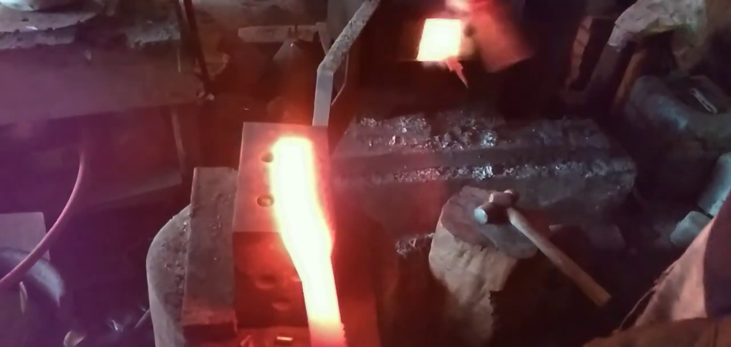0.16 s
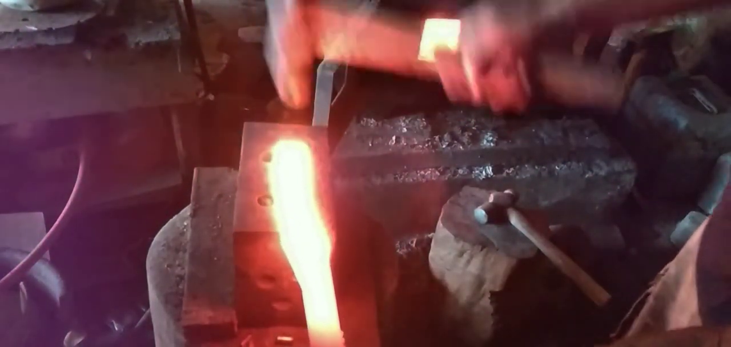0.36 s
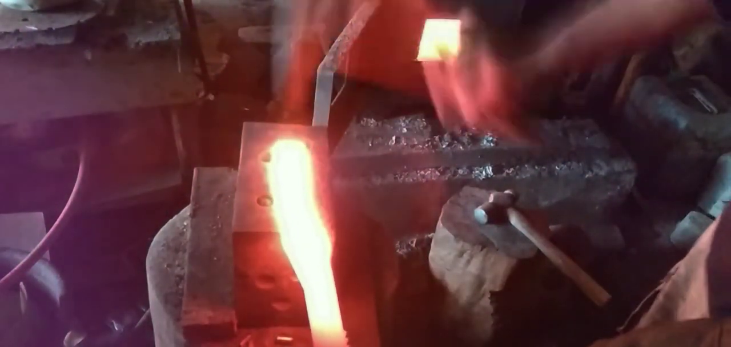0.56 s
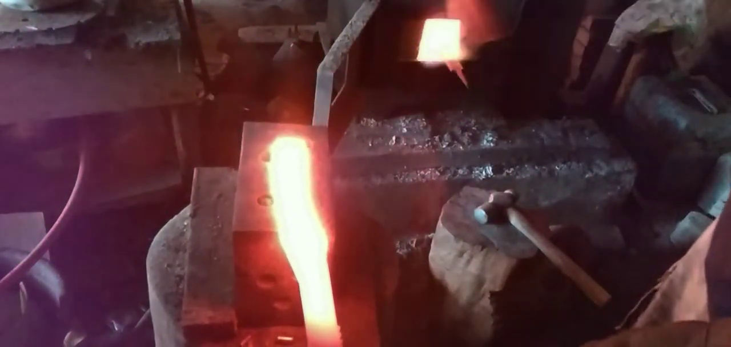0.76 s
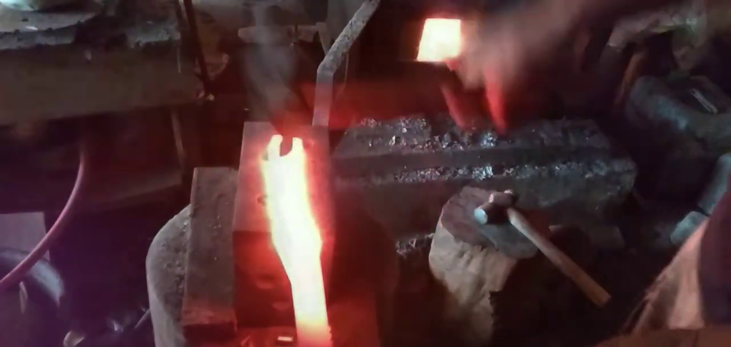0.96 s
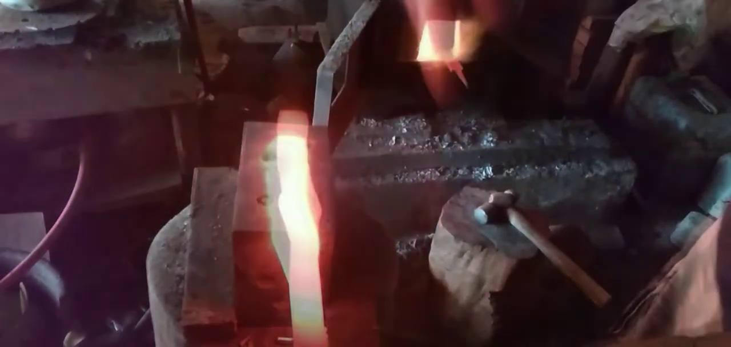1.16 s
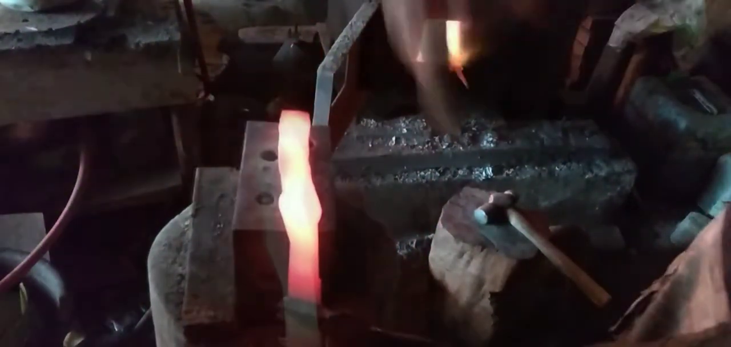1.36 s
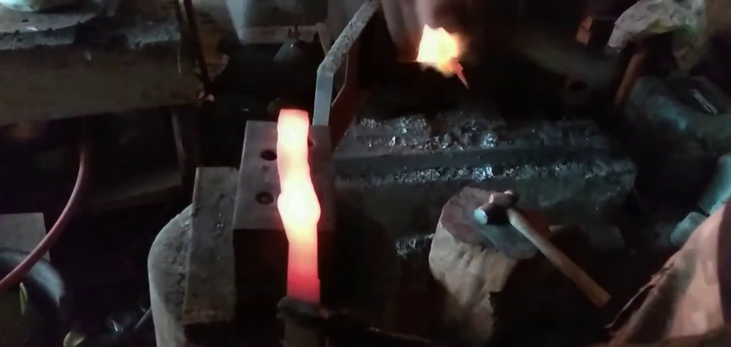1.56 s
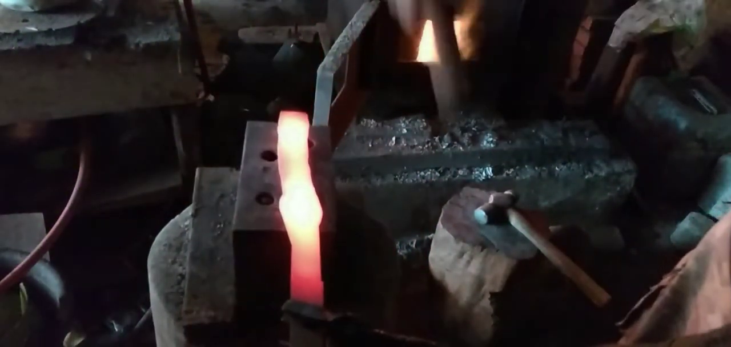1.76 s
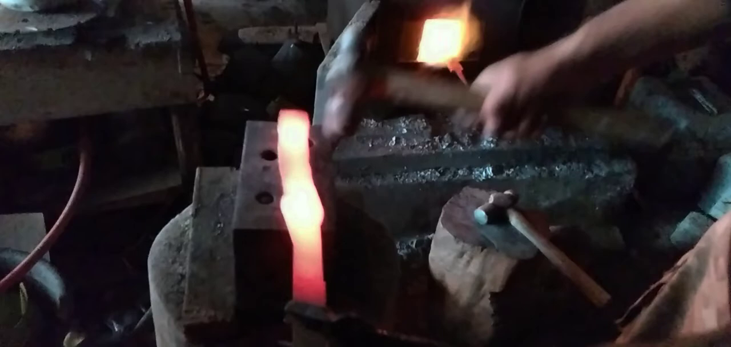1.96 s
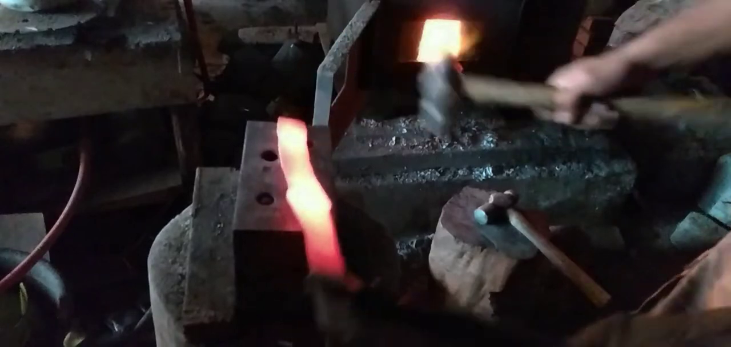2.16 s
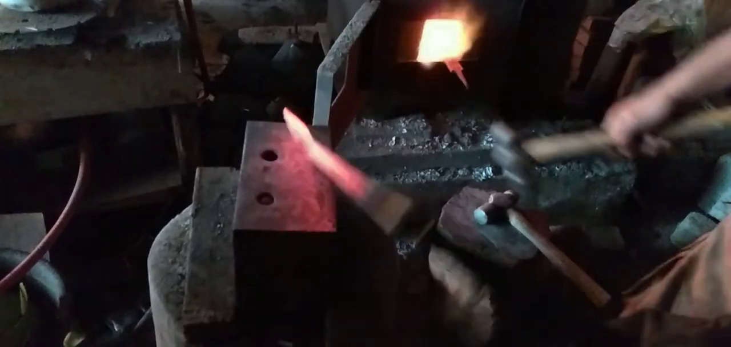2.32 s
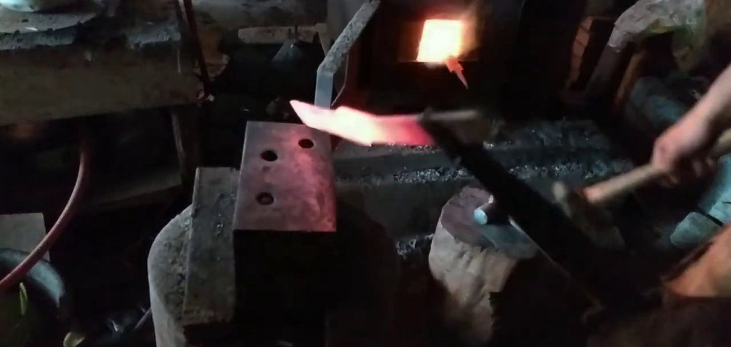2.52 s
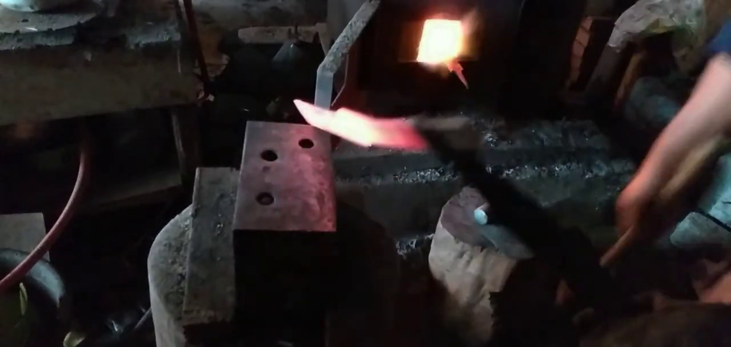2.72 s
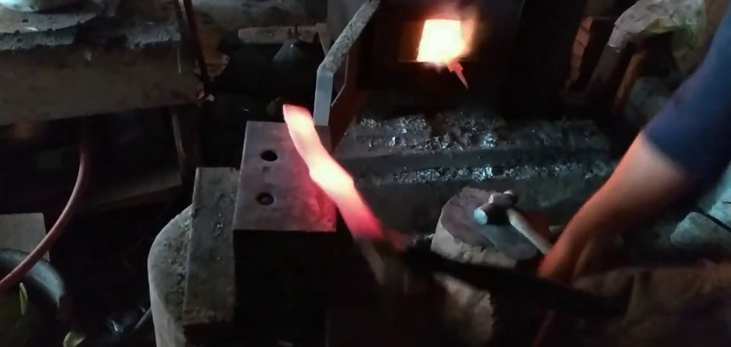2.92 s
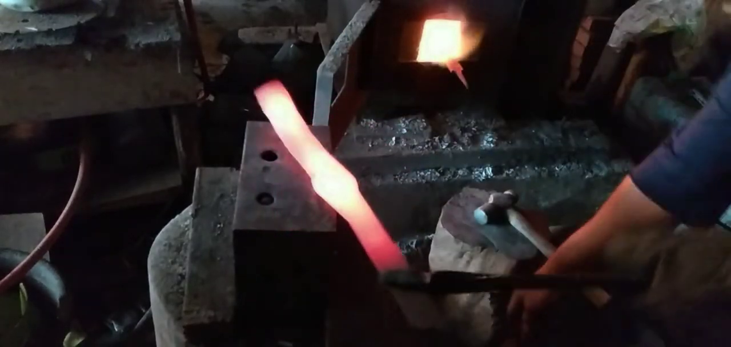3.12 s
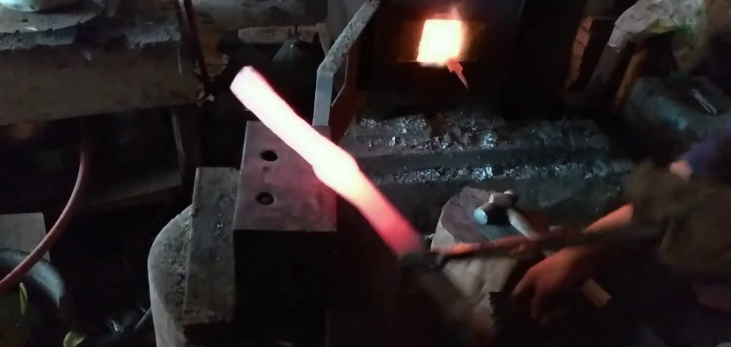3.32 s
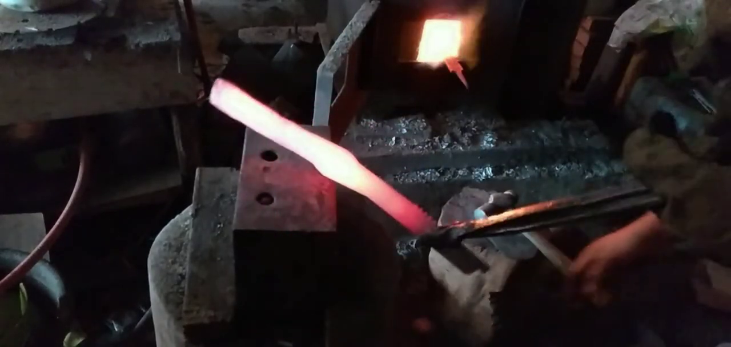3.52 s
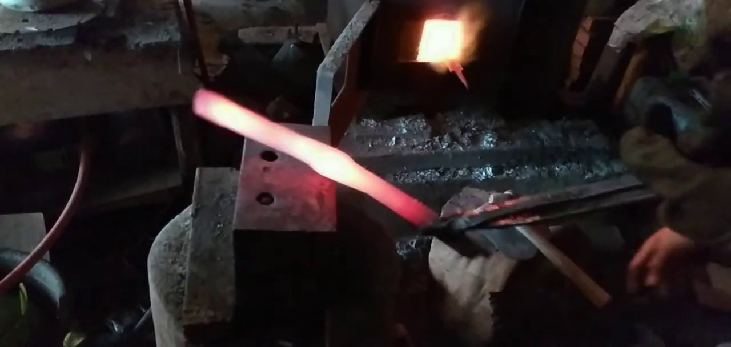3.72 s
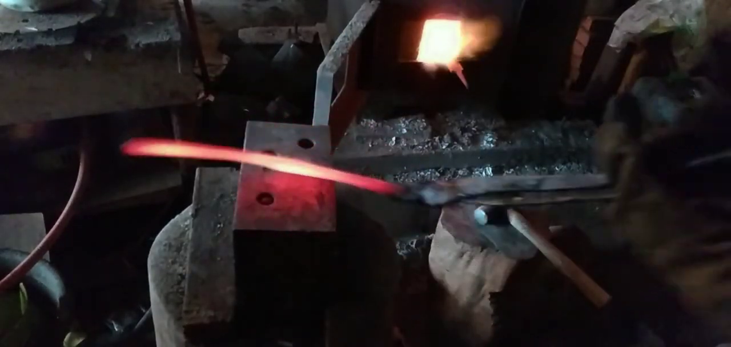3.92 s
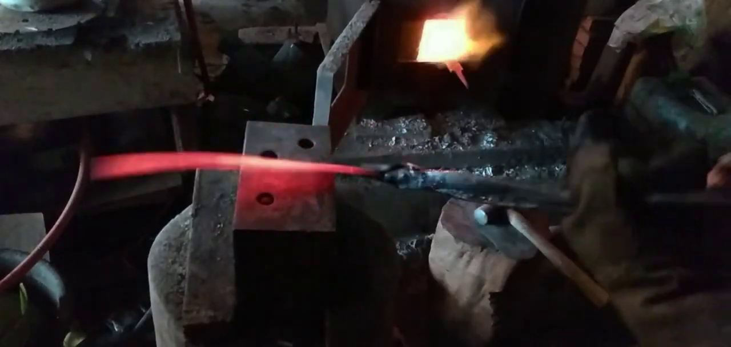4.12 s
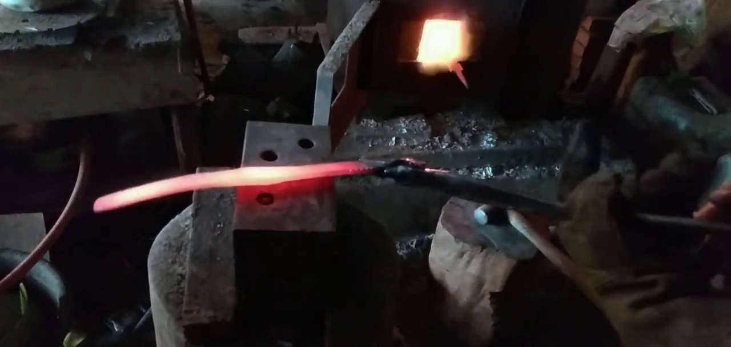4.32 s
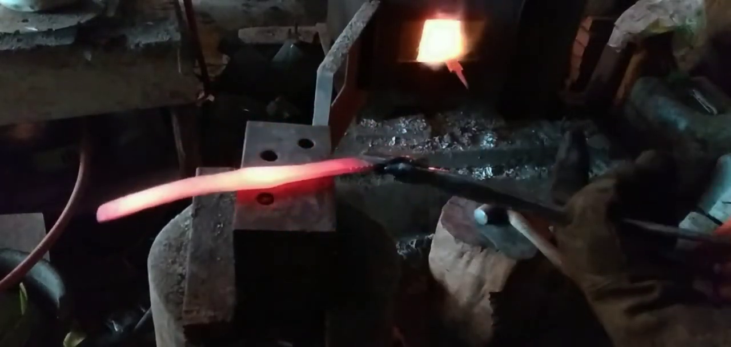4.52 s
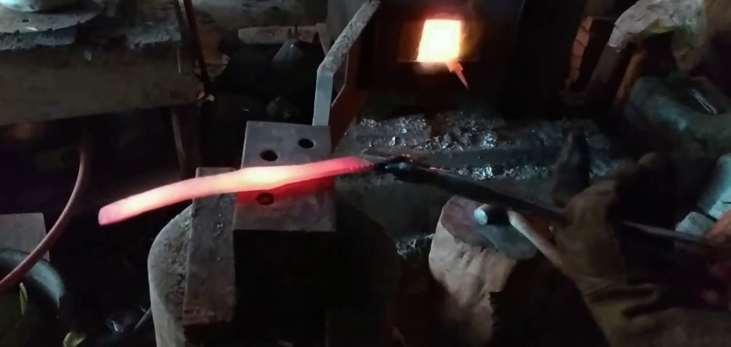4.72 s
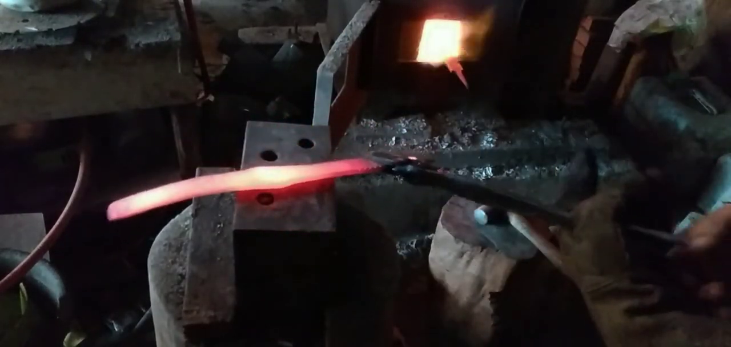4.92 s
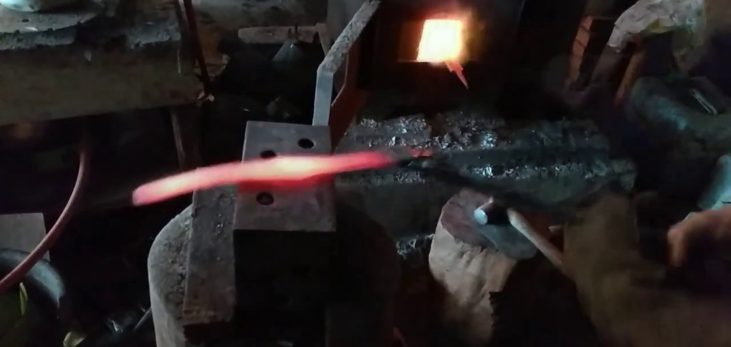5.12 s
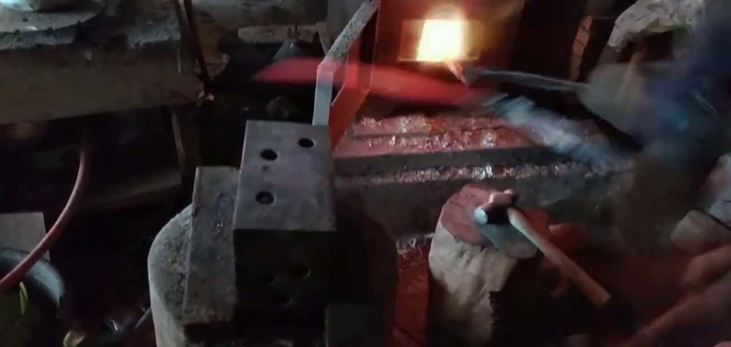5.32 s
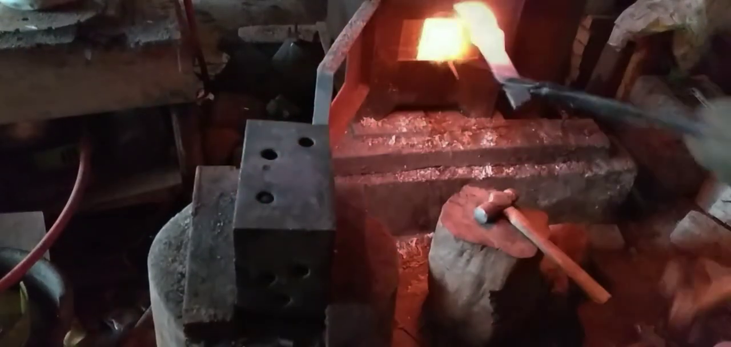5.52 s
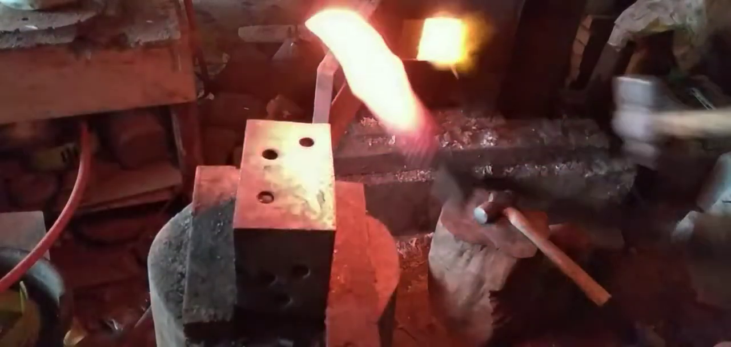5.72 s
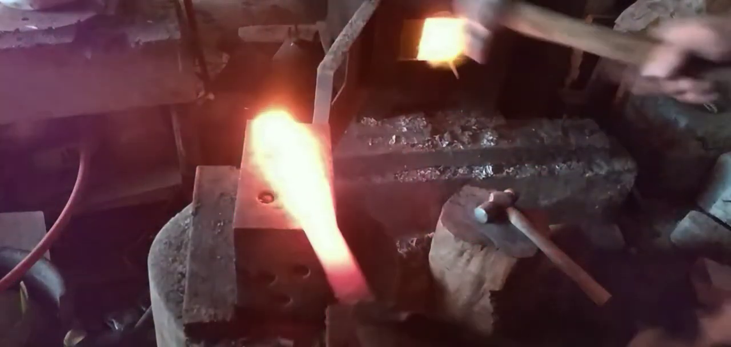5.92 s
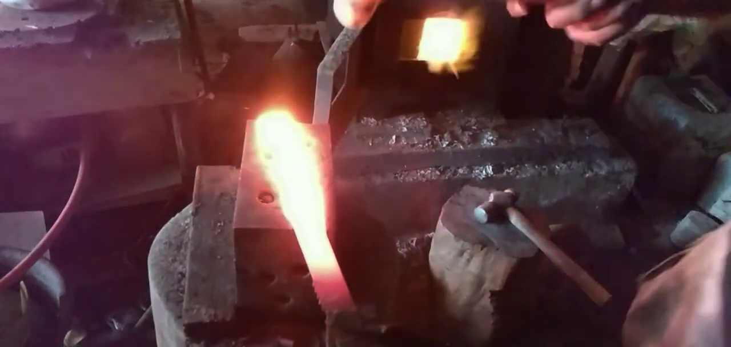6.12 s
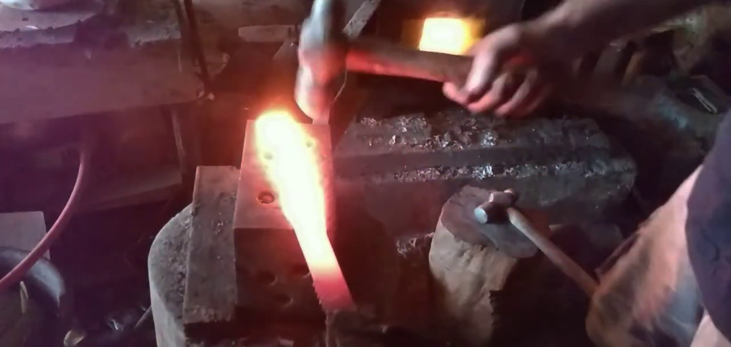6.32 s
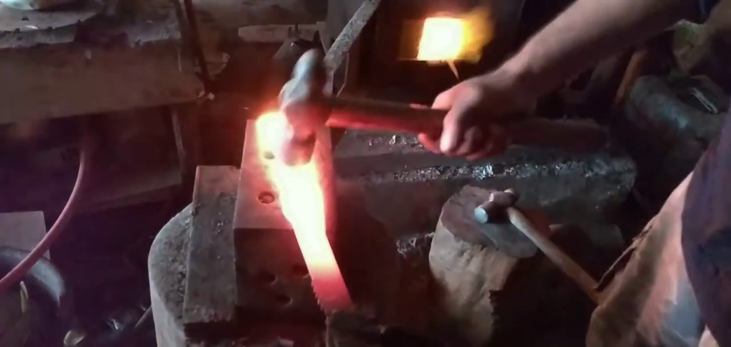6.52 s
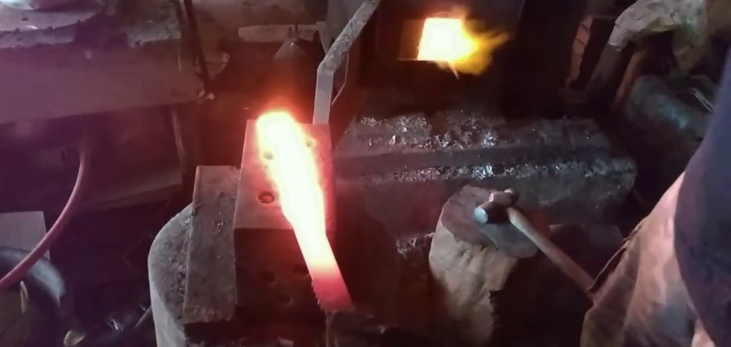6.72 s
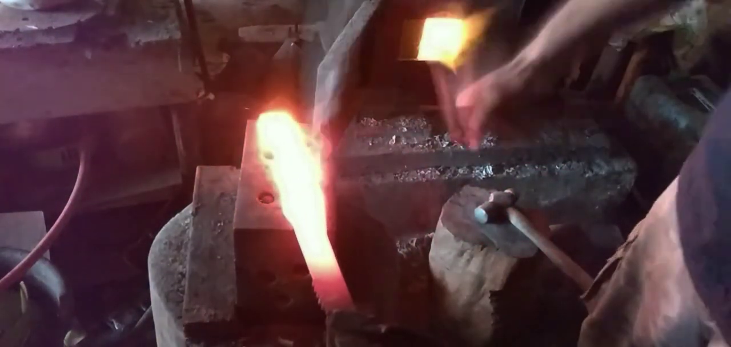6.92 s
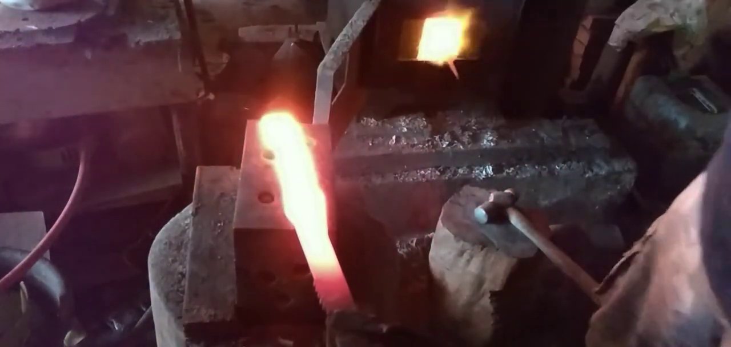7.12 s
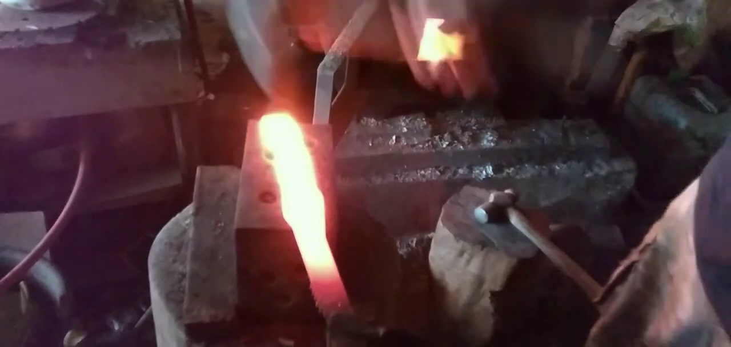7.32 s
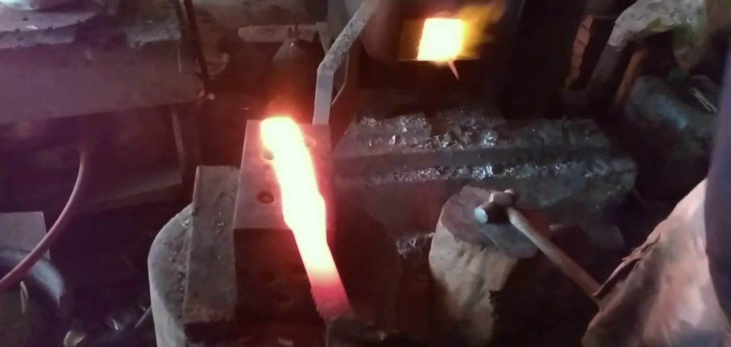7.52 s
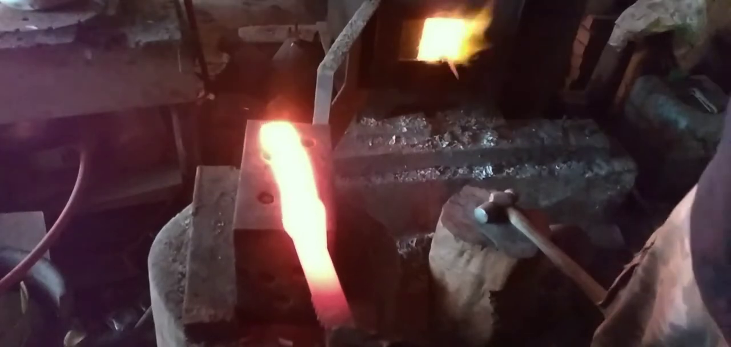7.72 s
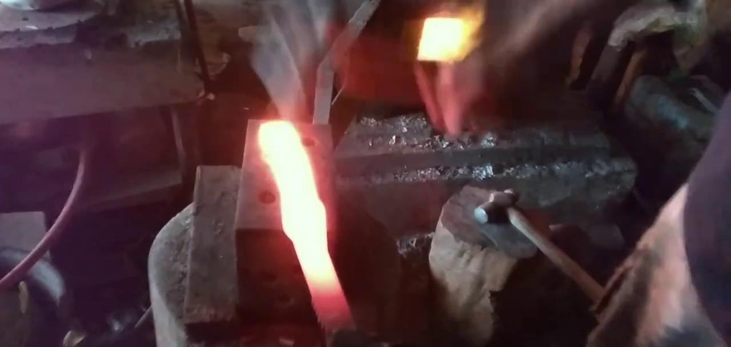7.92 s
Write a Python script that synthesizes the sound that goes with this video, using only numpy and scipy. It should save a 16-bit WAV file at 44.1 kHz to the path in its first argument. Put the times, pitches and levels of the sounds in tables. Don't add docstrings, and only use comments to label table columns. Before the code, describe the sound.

A gas forge runs throughout: a low, slightly fluttering roar from its chamber, with a thin quiet hiss and faint high whistle. Close in front, a hammer hits hot steel on an anvil at about 0.2, 0.5, 0.8, 1.15, 1.35 and 1.75 seconds, with lighter rebounds near 0.9 and 1.45. Each blow is a hard crack, a dense short clatter of bar and tongs, and a bright steel ring gone within a fraction of a second. A soft airy scrape follows at 1.9. From 2 to 5.8 the forge dominates, with tiny dry ticks near 2.9, 4.1 and 5.25, a faint scrape at 3.1, and a clearer double tick at 5.8. A sharp, very short knock lands at 6.4, then strong blows at 6.85, 7.2, 7.5 and 7.8, the last ringing most, with faint swishes between. The small stereo microphone clips and thumps on impacts; room echo is slight.

```python
import sys
import numpy as np
from scipy import signal
from scipy.fft import rfft, irfft, next_fast_len
from scipy.io import wavfile
from scipy.ndimage import map_coordinates

SR = 44100
rng = np.random.default_rng(int(sys.argv[2]) if len(sys.argv) > 2 else 0)


def persist_wave(psi):
    counts = np.round(np.clip(psi, -1, 1) * 32767).astype(np.int16)
    wavfile.write(sys.argv[1], SR, np.atleast_2d(counts).T)


def gain_from_db(level_db):
    decades = np.asarray(level_db, float) / 20
    return 10 ** decades


N = 355446


def unit(x):
    return x / np.sqrt(np.mean(x ** 2) + 1e-20)


def along(points, hz):
    f, values = np.transpose(points)
    return np.interp(np.log(hz + 1), np.log(f + 1), values)


def wobble(rate):
    knots = rng.standard_normal(int(N * rate / SR) + 4)
    return map_coordinates(knots, [np.arange(N) * rate / SR])


def filtered(x, response):
    size = next_fast_len(x.shape[-1] + 8192)
    spectrum = rfft(x, size) * response(np.fft.rfftfreq(size, 1 / SR))
    return irfft(spectrum, size)[..., :x.shape[-1]]


def peak(f, centre_hz, width_hz):
    return 1j * f * width_hz / (centre_hz ** 2 - f * f + 1j * f * width_hz)


def noise(size, response):
    # f/Hz, likeness [0-1]
    likeness = [(60, 0.97), (300, 0.98), (700, 0.72), (2000, 0.067), (15000, 0.14)]

    def shares(f):
        angle = np.arccos(np.clip(along(likeness, f), -1, 1)) / 2
        return np.array([np.cos(angle), np.sin(angle)])

    mid, side = filtered(rng.standard_normal((2, size)), shares)
    return unit(filtered(np.array([mid + side, mid - side]), response))


def clusters(f, depth_db, spacing_hz):
    knots = rng.standard_normal(2000)
    treble = np.clip(f / 3000, 0, 1) ** 2
    bumps = map_coordinates(knots, [np.clip(f / spacing_hz, 0, 1999)])
    return gain_from_db(depth_db * treble * bumps)


def add(out, s, sound):
    part = out[:, round(s * SR):][:, :sound.shape[1]]
    part += sound[:, :part.shape[1]]


def forge():
    # t/s, flame level/dB, level/dB of the hiss heard past the smith and his tools
    flame = [(0.0, -26, -50.5), (0.62, -24.5, -48.5), (0.9, -28, -48.5), (1.28, -28, -50), (1.68, -25, -45),
             (2.62, -25.5, -48), (3.1, -24.5, -47.5), (3.43, -25, -47.5), (3.66, -25.5, -50),
             (4.02, -24.5, -45.5), (4.2, -24.5, -49.5), (4.53, -25.5, -45.5), (4.78, -25, -45.5),
             (5.09, -28, -50), (5.55, -27.5, -52.5), (5.97, -25.5, -47.5), (6.6, -26, -50),
             (8.06, -25, -51)]
    # f/Hz, width/Hz, level/dB, left minus right/dB
    chamber_modes = [(47.7, 36, -10.5, -9), (84, 17.8, -4, 1.5), (109.3, 34.6, -5.5, -3.5),
                     (145, 22.5, -5.5, 2), (176.1, 33.3, 2, -1), (239.3, 19.5, -8.5, 3.5),
                     (262.1, 16, -3, 8), (341.3, 72, -3.5, -4.5), (400, 48, 0.5, -4), (456.1, 47.4, -1, -4),
                     (516.6, 46, -15.5, 1), (580.4, 75, -12, 3), (725.5, 38, -24, -12),
                     (870, 99, -22.5, 4.5), (1036, 31, -43, -12), (1144, 48, -26.5, 1),
                     (1279, 57, -34.5, -13), (1486, 130, -33.5, -7.5), (2016, 270, -36, -2.5)]
    # f/Hz, level/dB
    jet_colour = [(290, -58), (500, -4), (749, -3), (782, -8), (904, -9), (1390, -11.5), (1540, -12.5),
                  (1830, -17), (2310, -15), (3620, -18.5), (7670, -21), (10100, -16), (15800, -23)]
    s, *columns = np.transpose(flame)
    roar_db, hiss_db = [np.interp(np.arange(N) / SR, s, column) for column in columns]
    sides = np.array([[.5], [-.5]])

    def chamber(f):
        total = 0
        for k, (hz, width_hz, db, pan_db) in enumerate(chamber_modes):
            sign = (-1) ** k
            total = total + sign * gain_from_db(db + sides * pan_db) * peak(f, hz, width_hz) ** 2
        return total

    def jet(f):
        whistling = 1 + 1.3 * abs(peak(f, centre_hz=8130, width_hz=200))
        return gain_from_db(along(jet_colour, f)) * whistling

    flicker_db = 0.66 * wobble(5)
    roar = gain_from_db(roar_db + 2 + flicker_db) * noise(N, chamber)
    drone = gain_from_db(roar_db - 20.5) * noise(N, lambda f: jet(f) * (f < 5300))
    gusts_db = 1.1 * wobble(6)
    whistle_db = 0.4 * (roar_db + hiss_db) - 22.5
    whistle = gain_from_db(whistle_db) * noise(N, lambda f: jet(f) * (f >= 5300) * (f < 8500))
    hiss = gain_from_db(hiss_db + 1.5 + gusts_db) * noise(N, lambda f: jet(f) * (f >= 8500))
    return roar + drone + whistle + hiss


def ticks():
    # t/s, level/dB, time to fall by 60 dB/s, f/Hz, width/Hz
    knocks = [(2.894, -33.5, 0.085, 6500, 8000), (3.03, -30.5, 0.036, 2800, 5000),
              (3.032, -36, 0.094, 1000, 900), (4.065, -34, 0.035, 5000, 3000),
              (4.104, -31.5, 0.04, 9300, 3000), (5.248, -41, 0.032, 2500, 2500),
              (5.817, -18.5, 0.021, 6800, 4500), (5.8185, -26, .025, 11200, 3000),
              (5.8405, -30, 0.033, 6300, 2500), (5.8395, -34, .03, 10000, 3000),
              (5.846, -27.5, 0.03, 9500, 5000), (6.4243, 2, 0.022, 10100, 5930),
              (6.4243, -13, 0.022, 3670, 6000), (6.43, -27.5, 0.21, 9450, 5000),
              (6.445, -33, .02, 11000, 8000), (7.636, -32, .04, 9000, 6000)]
    out, t = np.zeros((2, N)), np.arange(SR // 5) / SR
    for s, db, t60, hz, width_hz in knocks:
        burst = noise(len(t), lambda f: peak(f, hz, 1.13 * width_hz) ** 2)
        add(out, s, gain_from_db(db - 60 * t / t60) * burst)
    return out


def swishes():
    # t/s, length/s, level/dB, f/Hz, width/Hz
    strokes = [(0.0, 0.029, -37, 4000, 3000), (0.183, 0.039, -42, 3200, 500),
               (0.189, 0.042, -39.5, 6400, 500), (1.87, 0.17, -31, 4370, 3500),
               (3.107, 0.17, -38.5, 4800, 9000), (5.54, 0.061, -45, 6950, 300),
               (5.546, 0.044, -47, 4600, 400), (6.745, 0.082, -39.5, 6400, 450),
               (6.787, 0.085, -41, 5160, 1800), (6.974, 0.091, -36, 3620, 400),
               (7.147, 0.048, -38, 6080, 350), (7.369, 0.055, -40, 4910, 1300),
               (7.446, 0.08, -37.5, 5600, 1800), (7.753, 0.088, -44.5, 4700, 596)]
    out, t = np.zeros((2, N)), np.arange(SR // 5) / SR
    for s, length, db, hz, width_hz in strokes:
        swell = np.sin(np.pi * np.clip(t / length, 0, 1) ** 0.48)
        flutter = gain_from_db(2.0 * map_coordinates(rng.standard_normal(24), [t * 90]))
        band = lambda f: peak(f, hz, width_hz) ** 2 * clusters(f, depth_db=5, spacing_hz=180)
        add(out, s, gain_from_db(db - 6) * swell * flutter * noise(len(t), band))
    return out


def shapes(place, ring_db, modes_db, waves):
    motion = abs(np.cos(np.pi * (np.multiply(waves, place) + .25))) + .03
    return ring_db - 1.7 + np.array(modes_db) + 20 * np.log10(motion)


def ring(pitches, levels_db, t60s, t):
    out = 0
    for hz, db, t60 in zip(pitches, levels_db, t60s):
        chance = rng.standard_normal((4, 2, 1))
        beat = 1 + .25 * np.sin(2 * np.pi * 30 * t * (1 + .3 * chance[2]) + 3 * chance[1])
        waver = .5 * np.sin(2 * np.pi * 15 * t + 3 * chance[3]) + 3 * chance[1, 0]
        level = gain_from_db(db + 2.8 * chance[0] - 60 * t / t60)
        out = out + level * beat * np.sin(2 * np.pi * hz * t + waver)
    return out * (1 - np.exp(-t / 0.0066))


def hammer():
    # t/s, clang level/dB, rise/s, clang's time to fall by 60 dB/s, time the clang stays at full
    # strength/s
    blows = [(0.0, -37.5, .001, 0.15, .001), (0.215, -8.5, 0.00053, 0.17, 0.0016),
             (0.5245, -5, 0.00063, 0.15, 0.0032), (0.8265, -9, 0.0038, 0.16, 0.0096),
             (0.913, -23.5, 0.0027, 0.28, 0.0091), (1.144, -11.5, 0.02, 0.18, 0.011),
             (1.341, -10, 0.0011, 0.28, 0.0068), (1.464, -21.5, 0.0008, 0.17, 0.0027),
             (1.7602, -6.5, 0.00091, 0.22, 0.0031), (6.8638, -2.5, 0.00042, 0.13, 0.0035),
             (7.1902, -2.5, 0.0011, 0.16, 0.0081), (7.5264, -8, 0.00089, 0.075, 0.021),
             (7.558, -17.5, .015, 0.088, 0.03), (7.827, -9, 0.017, 0.13, 0.036)]
    # t/s, place along the anvil [0-1], anvil level/dB, place across the hammer face [0-1],
    # hammer level/dB
    landing = [(0, 0.4, -30.9, 0.282, -34.2), (0.2146, 0.552, -10.5, 0.796, -8.5),
               (0.5238, 0.074, -7.2, 0.336, -8.4), (0.8272, 0.25, -5, 0.858, -10),
               (0.912, 0.29, -19, 0.534, -18.8), (1.146, 0.15, -4.5, 0.058, 6),
               (1.341, 0.66, -6, 0.91, -12), (1.464, 0.66, -10, 0.03, -12),
               (1.7605, 0.274, 0.5, 0.75, -7.0), (6.8632, 0.68, -8.5, 0.748, -11.3),
               (7.1906, 0.342, -0.9, 0.058, 8.5), (7.5263, 0.672, -0.5, 0.34, -1.2),
               (7.585, 0.44, -16.6, 0.182, -22.8), (7.827, 0.052, 13, 0.454, 6)]
    # f/Hz, level/dB
    clang_colour = [(290, -43), (500, -11), (1860, -10.5), (2030, -9), (2210, -9), (2750, -14),
                    (5190, -11.5), (7340, -4.5), (8010, -7.5), (11700, -12), (15800, -16)]
    anvil_hz = [6690, 7335, 8895, 10346, 11348]
    anvil_t60 = [.24, .17, .19, .15, .16]
    anvil_modes_db = [-7.5, -5.5, -5, -5.5, -1.5]
    anvil_waves = [4, 3, 2, 1, 5]
    head_hz = [4030, 8790, 12263, 12472, 14630]
    head_t60 = [.1, .11, .16, .14, .1]
    head_modes_db = [-2, 3, -12.5, -4.5, -5]
    head_waves = [3, 5, 1, 4, 2]

    out, t = np.zeros((2, N)), np.arange(SR // 3) / SR
    for (s, db, rise, t60, hold), (_, anvil_place, anvil_db, head_place, head_db) in zip(blows, landing):
        tilt_db = 1.53 + 0.059 * db
        colour = lambda f: gain_from_db(along(clang_colour, f) + tilt_db * np.log2(f / 5000 + .01))
        hollow = lambda f: 1 - 0.26 * abs(peak(f, centre_hz=4400, width_hz=8000))
        metal = lambda f: colour(f) * hollow(f) * clusters(f, depth_db=4.5, spacing_hz=130)

        start = np.sin(np.pi / 2 * np.clip(t / max(rise, 1e-4), 0, 1)) ** 2
        crack = 3.5 * gain_from_db(-60 * t / 0.027) * noise(len(t), colour)
        shop = gain_from_db(-31 - 60 * t / 0.61) * (1 - gain_from_db(-60 * t / 0.038))
        fall = gain_from_db(-60 * np.maximum(t - hold, 0) / t60)
        clang = gain_from_db(db) * (crack + (fall + shop) * noise(len(t), metal))

        anvil_levels = shapes(anvil_place, anvil_db, anvil_modes_db, anvil_waves)
        anvil = ring(anvil_hz, anvil_levels, anvil_t60, t)
        head_levels = shapes(head_place, head_db, head_modes_db, head_waves)
        head = ring(head_hz, head_levels, head_t60, t)
        add(out, s, start * (clang + anvil + head))
    return out


def scene():
    return forge() + ticks() + swishes() + hammer()


def offsets():
    # t/s, push on the left [full scale], push on the right [full scale]
    pushes = [(0.213, 0.017, -0.23), (0.522, -0.29, 0.0085), (0.83, 0.098, 0.053), (0.913, -0.021, -0.068),
              (1.151, -0.075, 0.035), (1.344, 0.14, 0.31), (1.463, 0.094, 0.043), (1.761, -0.035, -0.16),
              (6.426, -0.0095, -0.054), (6.863, -0.4, 0.09), (7.192, 0.3, -0.15), (7.526, 0.25, 0.0029),
              (7.832, -0.31, -0.14)]
    out, t = np.zeros((2, N)), np.arange(SR // 4) / SR
    bump = 4.5 * (np.exp(-t / 0.021) - np.exp(-t / 0.0052))
    for s, left, right in pushes:
        add(out, s, np.outer([left, right], bump))
    out[:, :len(t)] -= 0.15 * np.exp(-t / 0.071)
    return filtered(out, lambda f: 1j * f / (3.1 + 1j * f))


def low_pass(x):
    return signal.sosfilt(signal.butter(12, 15940, fs=SR, output="sos"), x)


def record(dry):
    # f/Hz, left minus right/dB
    port_difference = [(600, 0.5), (3300, 2.5), (5500, 2.5), (6800, 11.5), (8200, -4), (9500, -11.5),
                       (11000, -15.5), (13000, -8), (15500, -5)]
    lag = 7 / SR
    sides = np.array([[.5], [-.5]])
    ports = lambda f: gain_from_db(sides * along(port_difference, f)) * np.exp(-2j * np.pi * f * lag * sides)
    heard = filtered(dry, ports) + offsets()
    clipped = heard / (1 + abs(heard / .92) ** 6) ** (1 / 6)
    mix = filtered(clipped, lambda f: f < 15900)
    return low_pass(mix)


dry = scene()
out = record(dry)
persist_wave(out)
```